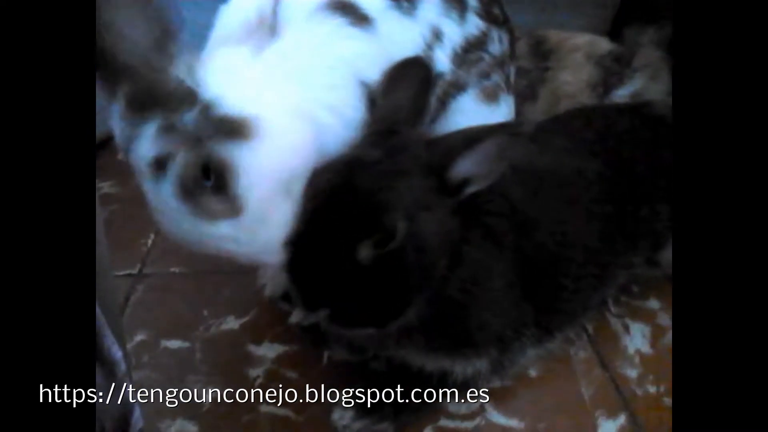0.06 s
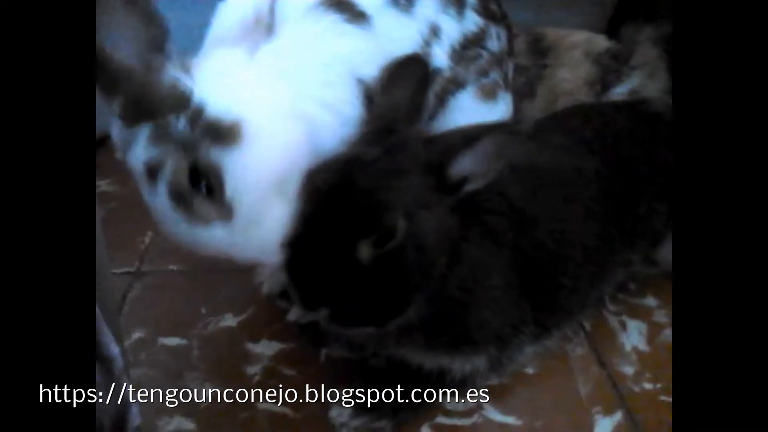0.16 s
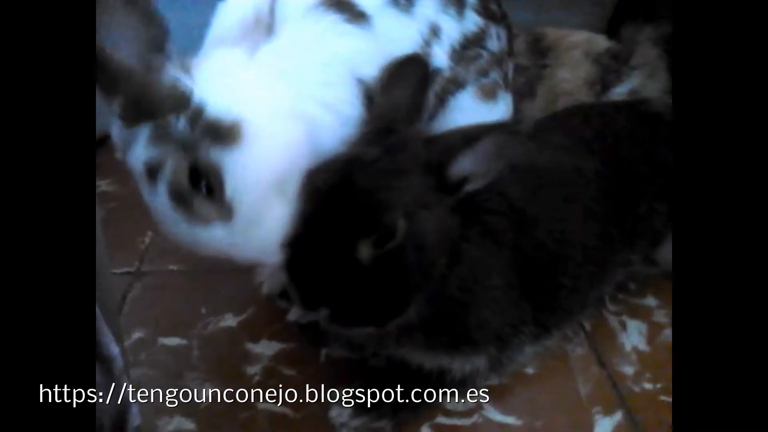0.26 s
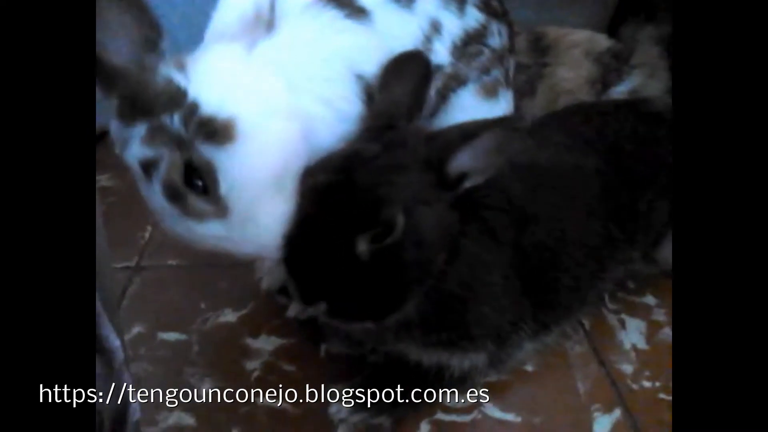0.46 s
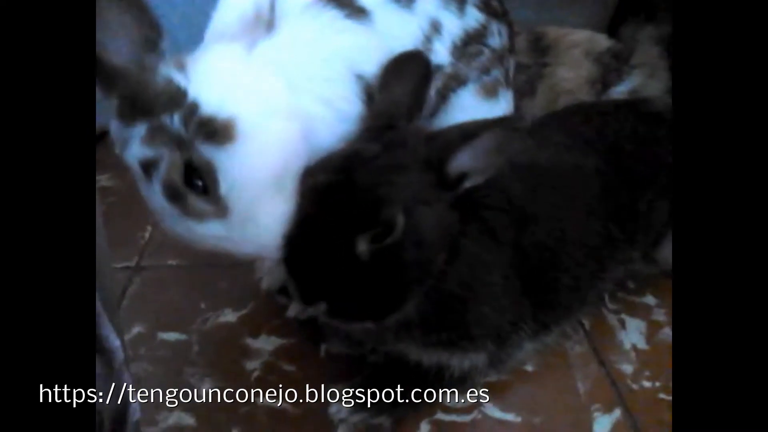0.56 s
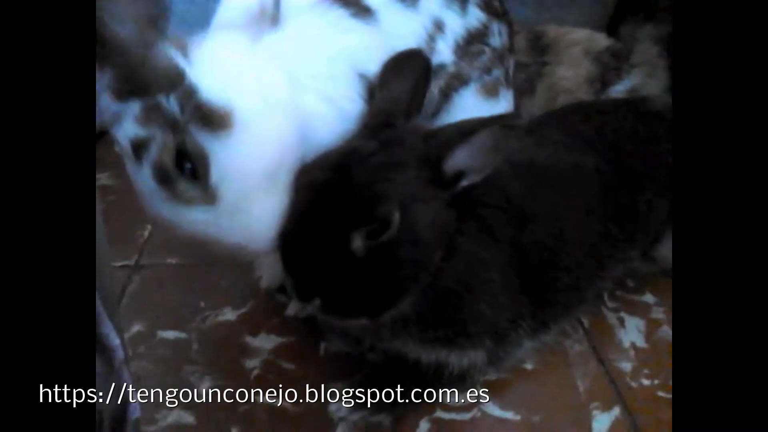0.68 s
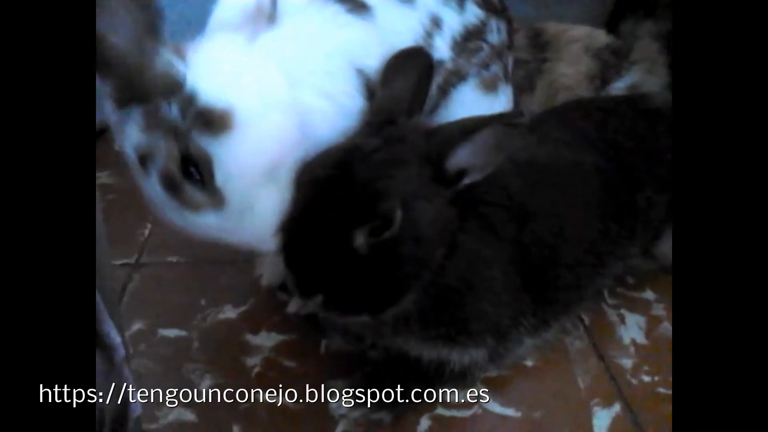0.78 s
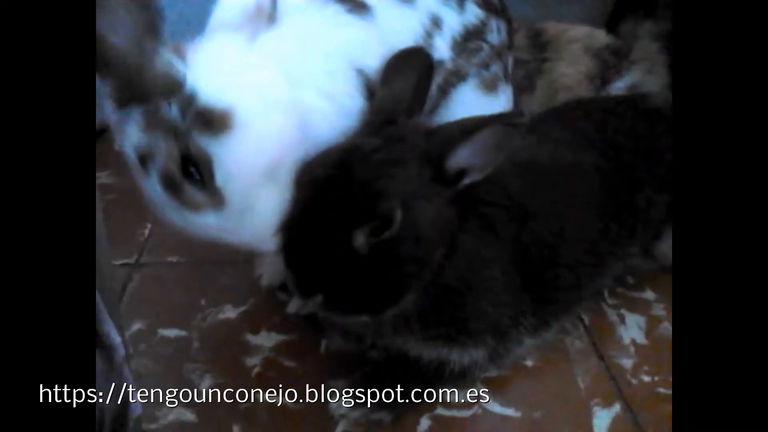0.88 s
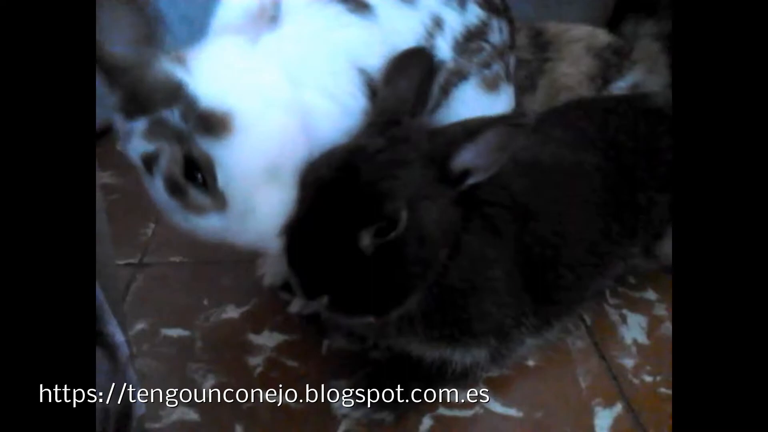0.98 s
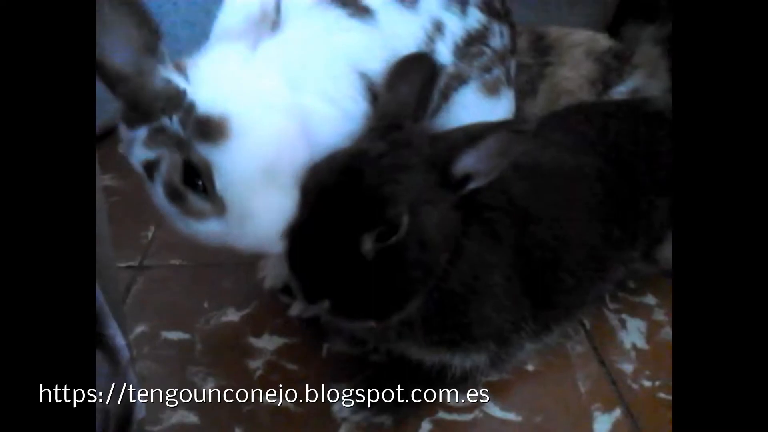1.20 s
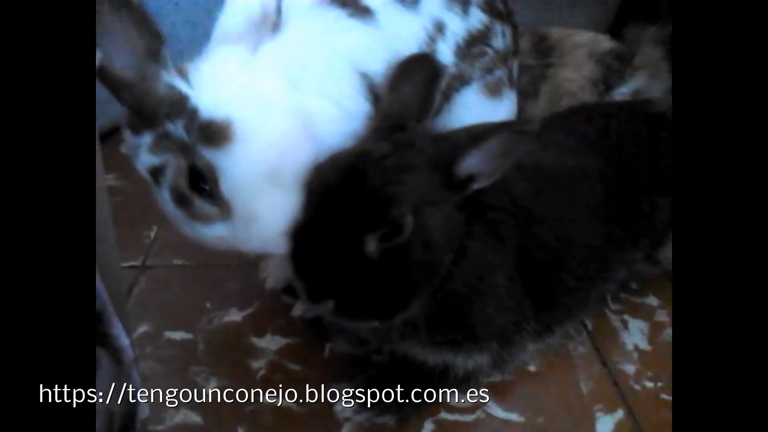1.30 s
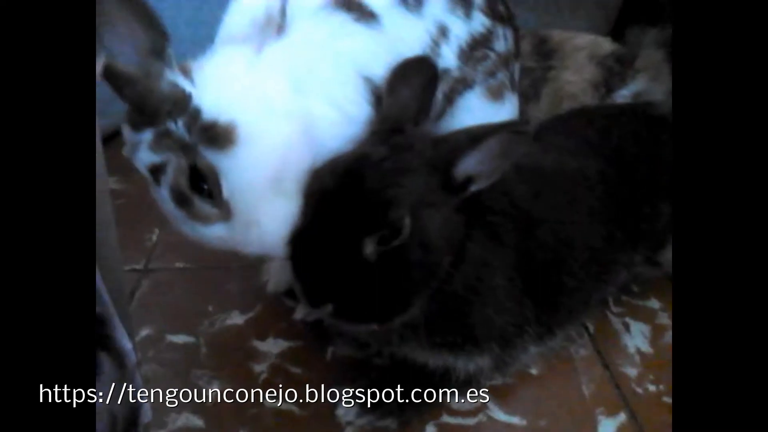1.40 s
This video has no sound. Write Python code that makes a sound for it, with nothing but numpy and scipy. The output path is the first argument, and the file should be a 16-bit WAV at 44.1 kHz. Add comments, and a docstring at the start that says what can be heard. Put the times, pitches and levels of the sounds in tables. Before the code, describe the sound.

A single thin, high squeak leaps up in pitch and rings briefly in a small hard room. Two soft scuffs follow, like rabbits shifting on tiles, while the microphone picks up a low appliance hum and quiet hiss.

```python
"""A low appliance hum and a quiet hiss fill a small hard room where two rabbits sit on a tiled floor.
At 0.18 s comes one thin, high squeak: a whistle that sags, leaps almost an octave, turns raspy,
holds and drops away. Reflections from floor and walls ring on after it.
At about 1 s two soft scuffs follow, their friction clicks ringing the rubbed surface,
and the hum and hiss carry on to the end."""
import sys
import numpy as np
from scipy import signal
from scipy.fft import rfft, irfft
from scipy.io import wavfile
from scipy.ndimage import uniform_filter1d

SR = 44100
rng = np.random.default_rng(int(sys.argv[2]) if len(sys.argv) > 2 else 0)


def inscribe(sig):
    """Save sig as 16-bit PCM at rate SR to the path in sys.argv[1].

    A 1-D sig is mono; a 2-D sig holds one channel per row.
    Samples are clipped to [-1, 1] before scaling.
    """
    pcm = np.round(np.clip(np.atleast_2d(sig).T, -1, 1) * 32767)
    wavfile.write(sys.argv[1], SR, pcm.astype(np.int16))


N = 63945


def squeak():
    """Frequency modulation: a jittery whistle glides with its harmonics and turns raspy as it leaps."""
    # Each row: time in seconds, pitch in Hz, level of the fundamental in dB.
    contour = [(0.181, 4318, -39), (.190, 4215, -46), (0.1928, 4094, -36), (.204, 3696, -32.5),
               (0.221, 3564, -28.5), (.228, 4499, -22.5), (.233, 5506, -18), (.240, 6132, -18),
               (.254, 6317, -16), (0.269, 6223, -14.5), (.277, 5722, -20.5), (0.283, 4622, -23),
               (0.286, 4830, -23.5)]
    # Each row: multiple of the pitch, level in dB against the fundamental at the highest pitch.
    overtones = [(2, -26.5), (3, -30), (4, -28)]
    # Each row: frequency in Hz, relative spectral density of the rasp in dB.
    rasp_spectrum = [(2900, -70), (3250, -42), (3500, 4), (4100, -1.5), (4650, 4), (5000, -7), (5800, 9.5),
                     (6500, 2), (6900, -14.5), (7600, -9), (9500, -18), (12000, -30), (12700, -2),
                     (13200, -38), (15500, -37)]
    jitter, shimmer_db, flutter_hz, edge_s = 0.019, 2, 306, 0.0018
    low_pitch_hz, brightening_db, overtone_top_hz = 3900, 18, 13060
    rasp_db, rasp_start_s, rasp_rise_s, rasp_fall_db_per_s = -22, 0.2232, 0.015, 198
    t = np.arange(N) / SR
    times, pitch, level = np.transpose(contour)
    hz = np.interp(t, times, pitch) * (1 + jitter * wander(flutter_hz))
    phase = 2 * np.pi * np.cumsum(hz) / SR
    lowness = np.clip((pitch.max() - hz) / (pitch.max() - low_pitch_hz), 0, 1)
    harmonics = sum(amp(db) * np.sin(k * phase) / (1 + (k * hz / overtone_top_hz) ** 20)
                    for k, db in overtones)
    tone = np.sin(phase) + amp(brightening_db * lowness) * harmonics
    whistle = np.sqrt(2) * tone * amp(np.interp(t, times, level) + shimmer_db * wander(flutter_hz))
    age = np.maximum(t - rasp_start_s, 0)
    rise = np.minimum(age / rasp_rise_s, 1)
    fall = amp(rasp_db - rasp_fall_db_per_s * np.maximum(age - rasp_rise_s, 0))
    rasp = rise * fall * colour(rng.standard_normal(N), rasp_spectrum)
    gate = np.clip((t - times[0]) / edge_s, 0, 1) * np.clip((times[-1] - t) / edge_s, 0, 1)
    low_cut = signal.butter(10, 3250, "high", fs=SR, output="sos")  # keeps the squeak thin
    return signal.sosfilt(low_cut, gate * (whistle + rasp))


def scuffs():
    """Friction excites resonance: runs of tiny clicks catch sharply, fade and ring the rubbed surface."""
    # Each row: start in seconds, length in seconds, level in dB before the catch and fade.
    strokes = [(1.007, .048, -46), (1.088, 0.039, -47.5)]
    # Each row: frequency in Hz, relative spectral density of the friction in dB.
    friction_spectrum = [(300, -14), (720, -1.5), (1250, -5), (1520, -1), (2100, -1), (3700, -1),
                         (4500, -6), (6200, -8.5), (8500, -29), (15000, -47)]
    # Each row: resonant frequency in Hz, bandwidth in Hz, gain in dB.
    surface_modes = [(797, 36, -6), (1040, 110, -10), (1458, 45, 8.5), (1640, 30, -19), (1857, 59, 3.5),
                     (3110, 82, -1.5)]
    clicks_per_s, spread_db = 5000, 2
    rise_s, fade_db, catch_db, catch_s = 0.0005, -7, 9, 0.0029
    t = np.arange(N) / SR
    clicks = rng.standard_normal(N) * (rng.random(N) < clicks_per_s / SR)
    clicks *= amp(spread_db * rng.standard_normal(N))
    envelope = np.zeros(N)
    for start, length, db in strokes:
        age = np.maximum(t - start, 0)
        gate = np.minimum(age / rise_s, 1) * (age < length)
        catch = catch_db * np.exp(-age / catch_s)
        envelope += gate * amp(db + catch + fade_db * age / length)
    rub = envelope * colour(clicks, friction_spectrum)
    return rub + sum(amp(db) * signal.lfilter(*signal.iirpeak(hz, hz / width, SR), rub)
                     for hz, width, db in surface_modes)


def room(x, wet_db):
    """Reverberation: direct sound, early echoes off floor and walls, a dense tail and a faint long ring."""
    # Each row: frequency in Hz, time in seconds to decay by 60 dB.
    decay_times = [(200, 0.25), (1500, 0.51), (3500, 0.37), (6200, 0.34), (9000, 0.32), (13000, 0.24)]
    gap_s, early_span_s, early_db = 0.002, 0.016, -3.5
    linger_db, linger_t60_s = -39.5, 2
    t = np.arange(SR) / SR
    hz, age, spectra = signal.stft(rng.standard_normal(SR), SR, nperseg=256)
    decay = amp(-60 * age / read(decay_times, hz)[:, None]) + amp(linger_db - 60 * age / linger_t60_s)
    tail = signal.istft(spectra * decay, SR, nperseg=256)[1][:SR] * (t > gap_s)
    delays = gap_s + early_span_s * rng.random(size=8)
    early = np.zeros(SR)
    early[(delays * SR).astype(int)] = rng.choice([-1, 1], len(delays))
    response = amp(wet_db) * (tail / np.linalg.norm(tail) + amp(early_db) * early / np.linalg.norm(early))
    response[0] += 1  # the direct path
    return signal.fftconvolve(x, response / np.linalg.norm(response))[:N]


def hum():
    """Slow modulation: two appliance tones waver, swell and fade; the lower one carries its octave."""
    # Each row: time in seconds, level of the low tone in dB, level of the high tone in dB.
    swells = [(0.0, -48.5, -67), (0.1, -53, -57.0), (0.17, -52, -63), (0.27, -53.5, -55.5),
              (0.35, -50.5, -60.5), (0.42, -58, -56), (0.5, -49, -61.5), (0.6, -55.5, -62),
              (0.742, -57.5, -57.5), (0.83, -47.5, -57), (0.93, -48.5, -58), (1.0, -60, -53),
              (1.08, -52.0, -74.5), (1.17, -57, -66), (1.249, -53.0, -53.5), (1.36, -47.5, -65),
              (1.45, -51.5, -62.5)]
    low_hz, high_hz, octave_db = 50.2, 207.7, -14
    drift_hz, waver_rate_hz = 2.04, 8.3
    t = np.arange(N) / SR
    times, low_db, high_db = np.transpose(swells)
    low_phase, high_phase = (
        2 * np.pi * (np.cumsum(hz + drift_hz * wander(waver_rate_hz)) / SR + rng.random())
        for hz in (low_hz, high_hz))
    low = amp(np.interp(t, times, low_db)) * (np.sin(low_phase) + amp(octave_db) * np.sin(2 * low_phase))
    high = amp(np.interp(t, times, high_db)) * np.sin(high_phase)
    return np.sqrt(2) * (low + high)


def air():
    """Broadband noise: the room's rumble and hiss, slightly patchy in time and frequency."""
    # Each row: frequency in Hz, relative spectral density in dB.
    ambient_spectrum = [(15, -1.5), (30, -1), (52, -1.5), (80, 0), (150, -9), (250, -6), (450, -18),
                        (900, -19.5), (1400, -22), (1750, -28.5), (3200, -29.5), (4800, -27.5),
                        (6100, -22.5), (8000, -29.5), (8800, -37), (15500, -34.5)]
    level_db, patch_db = -53, -0.17
    spectra = signal.stft(rng.standard_normal(N), nperseg=1024)[2]
    across_bands = uniform_filter1d(rng.standard_normal(spectra.shape), size=10, axis=0)
    patches = unit(uniform_filter1d(across_bands, size=5, axis=1))
    noise = signal.istft(spectra * amp(patch_db * patches), nperseg=1024)[1][:N]
    return amp(level_db) * colour(noise, ambient_spectrum)


def amp(db):
    """Converts decibels to an amplitude ratio."""
    return 10 ** (np.asarray(db) / 20)


def unit(x):
    """Normalises to rms 1."""
    return x / np.sqrt(np.mean(x ** 2) + 1e-20)


def read(points, hz):
    """Interpolates a table on a log-frequency axis."""
    f, value = np.transpose(points)
    return np.interp(np.log(hz + 1), np.log(f + 1), value)


def colour(x, points):
    """Spectral shaping: filters a signal by a curve in dB, then scales it to rms 1."""
    gain = amp(read(points, np.fft.rfftfreq(len(x), 1 / SR)))
    return unit(irfft(rfft(x) * gain, len(x)))


def wander(rate_hz):
    """Low-pass noise: smooth random motion up to a rate, at rms 1."""
    hz = np.fft.rfftfreq(N, 1 / SR)
    return unit(irfft(rfft(rng.standard_normal(N)) * (hz > 0) / (1 + (hz / rate_hz) ** 4), N))


def scene():
    """Superposition: all sources add at one microphone, heard alike on both channels."""
    mono = room(squeak(), wet_db=3) + room(scuffs(), wet_db=1.5) + hum() + air()
    return np.array([mono, mono])


def record(dry):
    """Self-noise and bandwidth: each channel gains its own faint hiss and is low-pass filtered."""
    # Each row: frequency in Hz, relative spectral density in dB.
    hiss_spectrum = [(20, 3), (130, 9), (300, -11), (1000, -7), (3000, 0), (7000, -6), (12000, -5),
                     (15500, 0.5)]
    hiss_db, cutoff_hz = -75.5, 15800
    hiss = amp(hiss_db) * np.array([colour(rng.standard_normal(N), hiss_spectrum) for _ in dry])
    low_pass = signal.firwin(511, cutoff_hz, window=("kaiser", 9), fs=SR)
    return signal.oaconvolve(dry + hiss, low_pass[None], "same")


dry = scene()
out = record(dry)
inscribe(out)
```